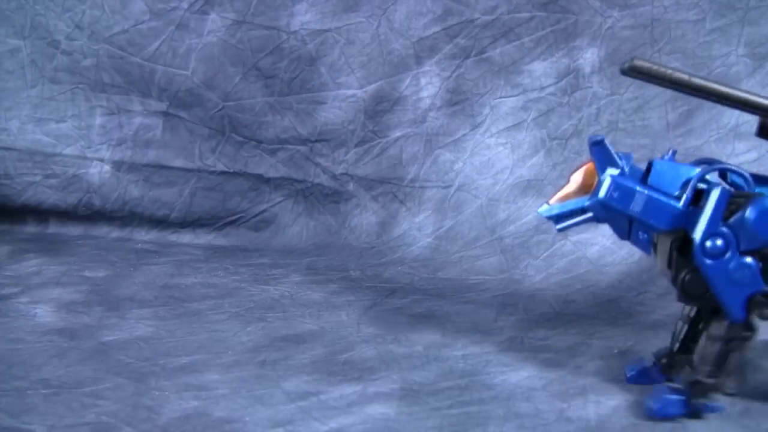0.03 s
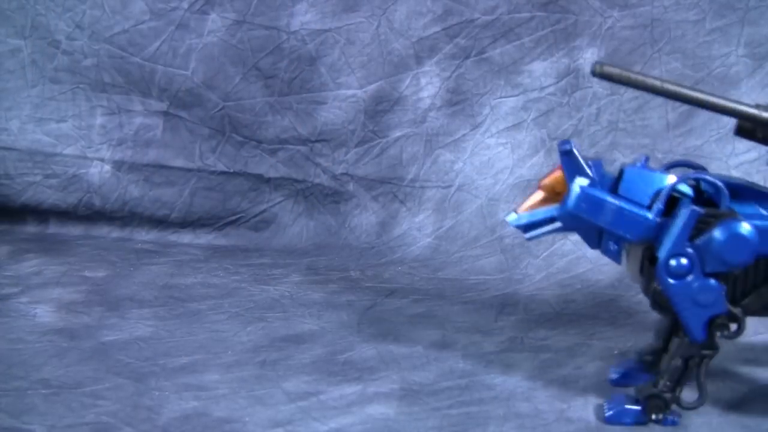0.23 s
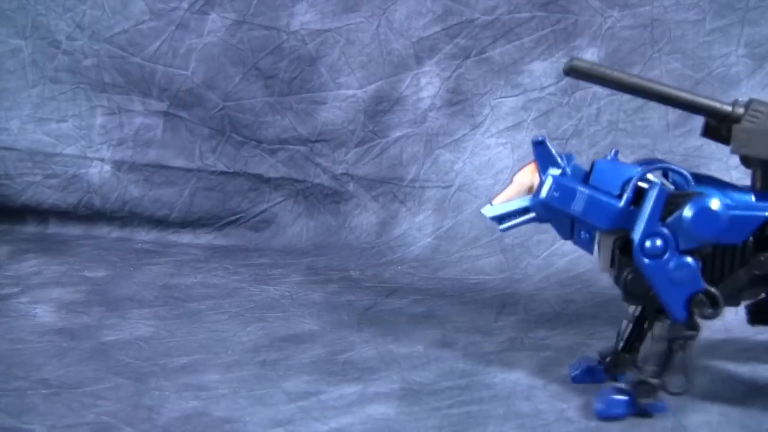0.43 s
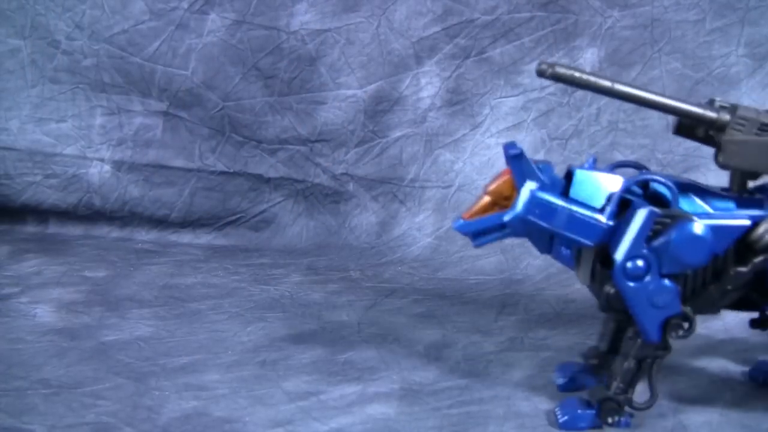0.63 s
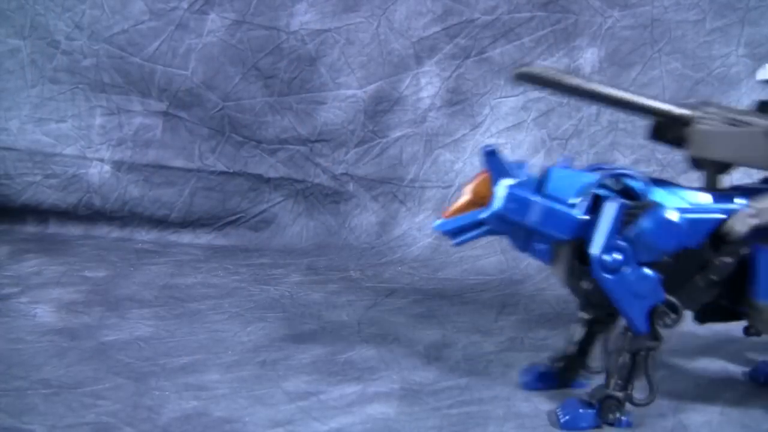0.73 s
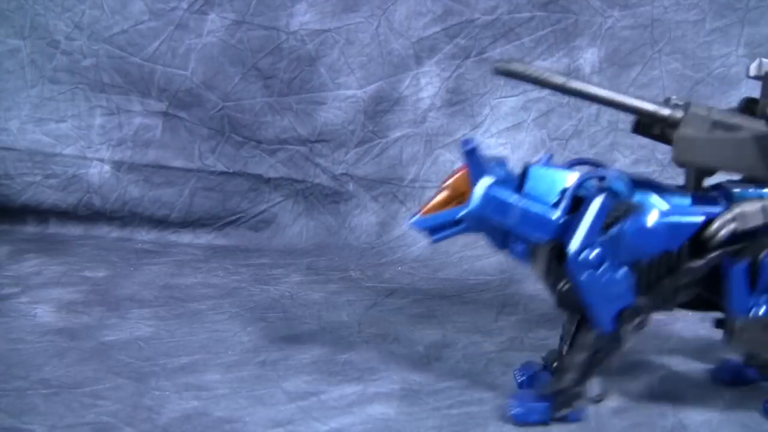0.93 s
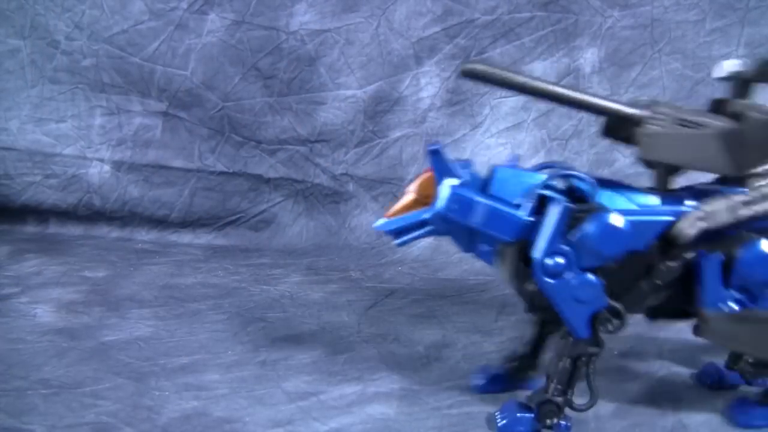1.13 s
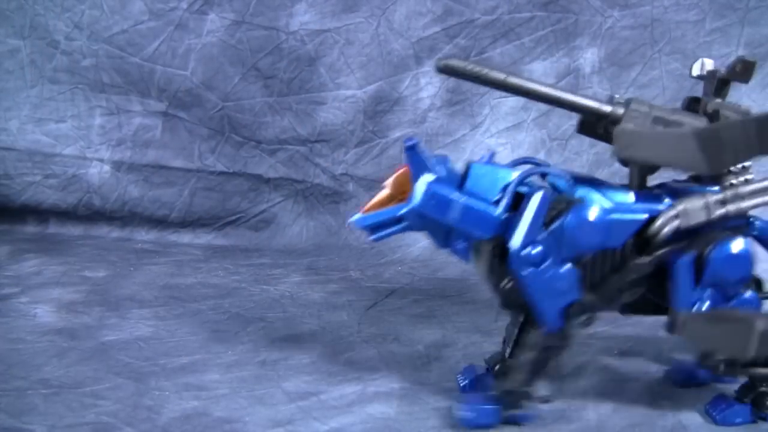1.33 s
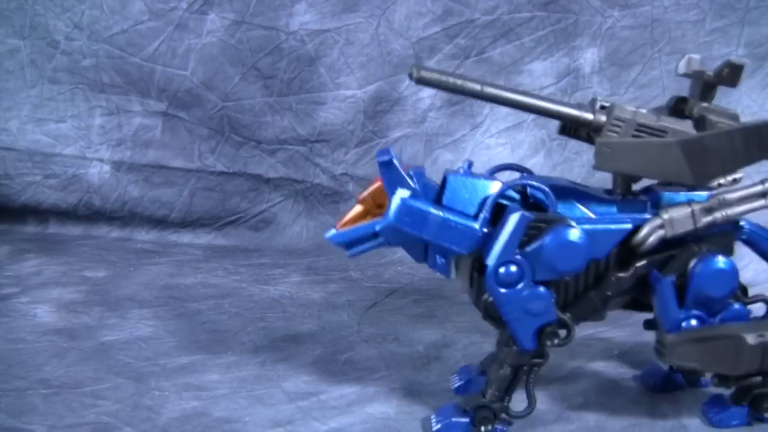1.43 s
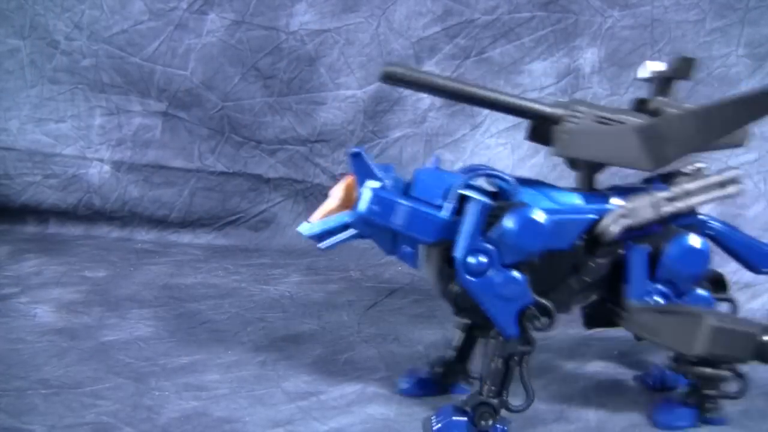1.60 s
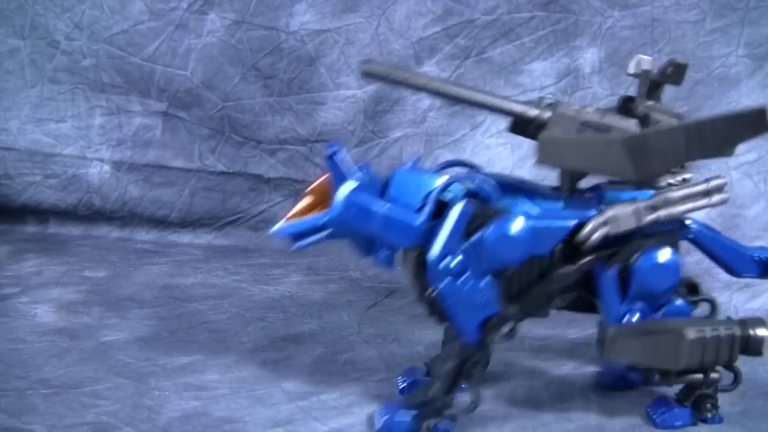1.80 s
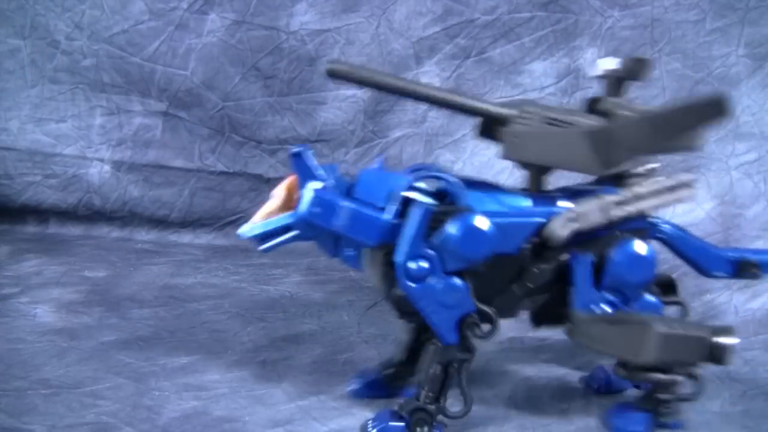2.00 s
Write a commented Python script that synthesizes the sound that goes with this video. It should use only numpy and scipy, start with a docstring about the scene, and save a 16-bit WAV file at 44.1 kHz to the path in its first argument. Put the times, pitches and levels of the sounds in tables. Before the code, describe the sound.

High, grainy whirring from a wind-up walking toy, with faint foot taps and small clicks

```python
"""On a cloth-covered table in a quiet room, a small clockwork model walks towards the middle.
Gear teeth tick thousands of times a second and excite the resonances of its plastic casing, under a varying load.
Feet excite damped modes of the table top and knock the casing; a foot snaps down and a joint clicks.
Shaped noise and steady sines give the room's rumble and hum and the microphone's hiss."""
import sys
import numpy as np
from scipy import signal
from scipy.fft import next_fast_len
from scipy.io import wavfile

SR = 44100
rng = np.random.default_rng(int(sys.argv[2]) if len(sys.argv) > 2 else 0)


def pcm_store(signal):
    """Save signal as 16-bit PCM."""
    levels = np.round(np.clip(np.atleast_2d(signal), -1, 1) * 32767)
    wavfile.write(sys.argv[1], SR, levels.astype(np.int16).T)


N = 90581

# Load on the gear train, heard in four parts of its sound:
# (time [s], whine level [dB], top level [dB], rattle level [dB], hollow level [dB])
GEAR_LOAD = [(0.0, -36, -35, -43, -48.5), (0.13, -44, -39.5, -48.5, -51.5), (0.2, -36.5, -36.5, -45, -44),
             (0.39, -39.5, -37.5, -46, -51.5), (0.42, -36, -36, -43, -44), (0.43, -37.5, -36.5, -42.5, -51),
             (0.46, -38, -35.5, -44.5, -48.5), (0.57, -41, -39, -50, -51.5), (0.61, -36, -36, -43.5, -48.5),
             (0.65, -36, -34.5, -41, -47.5), (0.67, -39, -36.5, -47, -47.5),
             (0.76, -38.5, -36.5, -48, -52.5), (0.82, -34.5, -34, -42.5, -44), (0.86, -36, -34.5, -45, -50),
             (0.95, -41, -37.5, -48.5, -48), (1.04, -34, -36, -45.5, -48), (1.08, -37, -34, -45.5, -44.5),
             (1.09, -39, -37, -45, -48), (1.16, -35.5, -38, -48.5, -50), (1.26, -33.5, -34, -45.5, -48.5),
             (1.39, -41.5, -38, -49.5, -49.5), (1.46, -34.5, -35, -48, -48),
             (1.5, -31.5, -35.5, -43.5, -44.5), (1.51, -37.5, -38, -47, -47.5),
             (1.64, -36, -36.5, -48, -49.5), (1.68, -32, -34, -45.5, -49),
             (1.81, -39.5, -37.5, -49.5, -50.5), (1.92, -34, -35.5, -45, -46.5),
             (2.02, -36, -41, -50.5, -50), (2.04, -36.5, -39, -49, -46), (2.05, -34, -39, -48, -56)]
# Casing resonances, from low to high parts; the highest row of the top is a hiss that swells with the load.
# Pan and diffuse part hold at an off-centre factor of 1:
# (frequency [Hz], width of one filter stage [Hz], relative level [dB], left-right pan [dB], diffuse part [dB])
HOLLOW_MODES = [(468, 190, -16.5, -3, -12), (673, 33, -14, -2, -14), (763, 147, -18, -7, -17),
                (1213, 380, -9, -1, -15), (1383, 216, 0.5, -1, -26), (1395, 60, -4.5, -2, -26),
                (1619, 390, -3, -1.5, -25)]
RATTLE_MODES = [(2032, 410, -1.5, -1, -33), (2108, 36, 1.5, -3.5, -32), (2435, 76, -0.5, 1, -30),
                (2621, 530, -1, 0.5, -38), (2720, 28, 3.5, -3, -40), (3203, 950, -2, -5.5, -43),
                (3932, 510, -1, -8.5, -44), (4433, 180, 0, 8, -30)]
FLANK_MODES = [(4808, 730, 0, -1, -32)]
WHINE_MODES = [(5260, 460, 1, -5.5, -14), (5270, 60.5, 3, -15, -14), (5460, 62, 1, -3, -6),
               (5587, 120.2, 1.5, -2, -16), (5750, 500, -2.5, 12.5, -16), (5630, 56, 1.5, -14, -14),
               (6113, 510, -4.5, -19, -5), (6614, 810, -10, -15, 1)]
TOP_BANDS = [(7470, 1050, -10.5, -8, 2), (8430, 1100, -10.5, -4, -9), (9210, 920, -7.5, -5, -9),
             (10420, 1560, -8.5, 0.65, -5), (11200, 1080, -1.5, 4.5, -6), (11060, 110, -7.5, 0, -11),
             (11450, 140, -4.5, 2, -4), (12400, 1200, -15, 3, -16), (14000, 1400, -21.5, -2, 11),
             (15650, 680, -12, 0, 2)]
# Position of the model: (time [s], off-centre factor [0 to 1])
OFF_CENTRE_PATH = [(0, 0.84), (1.0, 0.45), (2.05, 0.018)]
# Where the whine is strongest; its departures from the mean are used: (time [s], frequency [Hz])
WHINE_RIDGE_PATH = [(0, 5452), (.16, 5617), (.35, 5457), (.58, 5648), (.67, 5420), (1.4, 5534),
                    (1.66, 5317), (1.9, 5558), (2.05, 5328)]
# Landings of the feet:
# (time [s], relative thud level [dB], relative casing knock level [dB], table pitch favoured by the spot [Hz])
FOOTFALLS = [(.232, -51, -50, 250), (0.263, -52.5, -45, 288), (0.421, -62, -49, 290), (.628, -56, -52, 620),
             (0.835, -60, -58, 790), (1.025, -59, -51, 790), (1.075, -56, -42, 500),
             (1.106, -53.5, -61, 400), (1.248, -59, -44.5, 500), (1.328, -55, -59, 175),
             (1.497, -53.5, -43.5, 402), (1.679, -53.5, -47, 297), (1.911, -54, -56, 470),
             (1.936, -64, -40, 400)]
# Modes of the table top: (frequency [Hz], relative level [dB], decay time t60 [s])
TABLE_MODES = [(180, -8, 0.048), (208, 1.5, 0.1), (287, 2.5, 0.1), (404, -3, 0.045), (466, 4.5, 0.087),
               (627, 7, 0.05), (760, 14, 0.032)]
# Deep bumps of the table: (time [s], approximate peak level [dB])
TABLE_SWAYS = [(.63, -51.5), (1.99, -52)]
# Snaps of a joint: (time [s], relative level [dB])
JOINT_SNAPS = [(.2069, -35), (0.416, -25), (.651, -31), (1.256, -23), (1.499, -34), (1.6447, -25)]
# Rumble spectrum: (frequency [Hz], relative level per Hz [dB])
ROOM_SPECTRUM = [(12, -30), (20, 0), (38, 2), (59, -3), (122, -5), (160, -10), (199, -8), (231, -8.5),
                 (283, -0.5), (329, -6.5), (484, -10), (870, -16.5), (1100, -16), (1430, -38), (2420, -120)]
# Left-right likeness of the rumble: (frequency [Hz], likeness [0 to 1])
ROOM_LIKENESS = [(30, .98), (60, 0.96), (141, 0.35), (220, 0.5), (500, 0.68), (1000, 1)]
# Left-right balance of the rumble: (frequency [Hz], left over right [dB])
ROOM_BALANCE = [(60, -0.5), (140, 3.5), (300, -1), (600, -3)]
# Steady hum: (frequency [Hz], rms level [dB])
HUM_TONES = [(31.8, -68.5), (60, -82), (89.6, -68.5), (120, -65.5)]

TICKS_PER_S, TICK_SPREAD_DB, TICK_OWN_DB = 10000, 0.85, 2.5
CHATTER_DB, CHATTER_HZ = 0.3, 80  # quick unevenness of the mesh
MESH_PER_S, MESH_WANDER, MESH_DB = 338, 0.0603, -0.5  # tooth rate of the fastest wheel
WAVER_DB, WAVER_HZ = 1.43, 6  # each resonance swells and fades on its own
NARROW_WAVER_DB, NARROW_HZ = 2, 110  # extra waver of the sharp resonances
PITCH_WANDER, PITCH_WANDER_HZ = .004, 4  # relative straying of pitch as the casing flexes
RIDGE_FOLLOW = .5  # share of the ridge movement taken by the broadest whine resonances
FLANK_DB, FLANK_OFF_CENTRE_DB = -9, -6  # relative to the whine; the second times the off-centre factor
LEFT_LAG_S = 22e-6  # lag of the left channel at an off-centre factor of 1
KNOCK_HZ, KNOCK_WIDTH_HZ = 1385, 170
SOLE_HZ = 900  # softness of the contact through the cloth
SPOT_DB_PER_OCTAVE = 11.5  # loss of modes away from the favoured pitch
SWAY_HZ, SWAY_T60_S = 30, 0.69
TAP_S, TAP_PEAK_DB, TAP_SOFTNESS_HZ = 2.012, -34, 1300
SNAP_HZ, SNAP_WIDTH_HZ = 5500, 2200
RUMBLE_RMS_DB, RUMBLE_PATCHY_DB, RUMBLE_PATCHY_HZ = -59, 2.5, 3.8
MIC_HISS_RMS_DB, MIC_HISS_HZ, MIC_HISS_WIDTH_HZ, MIC_HISS_LIKENESS = -52, 14300, 3400, 0.14
CUTOFF_HZ = 15720
LEFT_RIGHT = np.array([[1], [-1]])


def gear_ticks():
    """Random impulse excitation: tooth contacts of uneven size, their strength modulated at the mesh rate."""
    born = rng.random(N) < TICKS_PER_S / SR
    mesh_hz = MESH_PER_S * (1 + MESH_WANDER * drift(24.5))
    mesh = np.cos(2 * np.pi * np.cumsum(mesh_hz) / SR)
    size_db = TICK_SPREAD_DB * np.minimum(rng.exponential(1, N), 5)
    return born * amp(size_db + CHATTER_DB * drift(CHATTER_HZ) + MESH_DB * mesh)


def excited_bands(ticks, bands, level_db, lag_s=0, shift_hz=0):
    """Resonant filtering of impulses: each tick drives every band with its own strength and sign."""
    off_centre, = in_time(OFF_CENTRE_PATH)
    out = 0
    for hz, width_hz, db, pan_db, diffuse_db in bands:
        sharp = np.exp(-width_hz / NARROW_HZ)
        waver_db = WAVER_DB + NARROW_WAVER_DB * sharp
        signs = rng.choice([-1, 1], (2, N))
        strength_db = TICK_OWN_DB * rng.standard_normal(N) + waver_db * drift(WAVER_HZ)
        ringing = resonate(ticks * signs * amp(strength_db), hz, width_hz)
        stray_hz = PITCH_WANDER * hz * drift(PITCH_WANDER_HZ)
        # sharp resonances barely follow the common shift
        mid, side = shifted(ringing, (1 - sharp) ** 2 * shift_hz + stray_hz)
        # a small delay is approximated by subtracting the slope
        side = amp(diffuse_db) * side - lag_s * SR / 2 * np.gradient(mid)
        panned = mid * amp(pan_db * off_centre / 2 * LEFT_RIGHT)
        out = out + amp(db) * (panned + off_centre * side * LEFT_RIGHT)
    return amp(level_db) * rms_one(out)


def gear_train():
    """Common excitation: the same ticks drive the casing and the load-borne hiss, each part at its load level."""
    ticks = gear_ticks()
    whine_db, top_db, rattle_db, hollow_db = in_time(GEAR_LOAD)
    off_centre, = in_time(OFF_CENTRE_PATH)
    ridge_hz, = in_time(WHINE_RIDGE_PATH)
    whine_shift_hz = RIDGE_FOLLOW * (ridge_hz - ridge_hz.mean())
    flank_db = whine_db + FLANK_DB + FLANK_OFF_CENTRE_DB * off_centre
    whine = excited_bands(ticks, WHINE_MODES, whine_db, LEFT_LAG_S, whine_shift_hz)
    top = excited_bands(ticks, TOP_BANDS, top_db, LEFT_LAG_S)
    flank = excited_bands(ticks, FLANK_MODES, flank_db, LEFT_LAG_S)
    rattle = excited_bands(ticks, RATTLE_MODES, rattle_db)
    hollow = excited_bands(ticks, HOLLOW_MODES, hollow_db)
    return whine + top + flank + rattle + hollow


def feet():
    """Impact on a damped plate: landings ring table modes through a soft contact and knock the casing."""
    s, thud_db, knock_db, spot_hz = np.transpose(FOOTFALLS)
    chance_db = rng.normal(0, 1, (len(s), len(TABLE_MODES)))
    thuds = 0
    for k, (hz, db, t60) in enumerate(TABLE_MODES):
        spot_loss_db = SPOT_DB_PER_OCTAVE * abs(np.log2(hz / spot_hz))
        blows = clicks(s, thud_db + db + chance_db[:, k] - spot_loss_db)
        thuds = thuds + ring(blows, hz, t60)
    sways = ring(clicks(*np.transpose(TABLE_SWAYS)), SWAY_HZ, SWAY_T60_S)
    knocks = resonate(clicks(s, knock_db) * SR / KNOCK_WIDTH_HZ, KNOCK_HZ, KNOCK_WIDTH_HZ)
    soft = np.exp(-2 * np.pi * SOLE_HZ / SR)
    softened = signal.lfilter([(1 - soft) ** 2], [1, -2 * soft, soft * soft], thuds + sways)
    return softened + knocks


def tap():
    """Critically damped pulse: one foot snaps down as a single rounded push."""
    age = np.maximum(np.arange(N) / SR - TAP_S, 0) * 2 * np.pi * TAP_SOFTNESS_HZ
    return amp(TAP_PEAK_DB) * np.e * age * np.exp(-age)


def snaps():
    """Impulse response of a broad resonance: a joint snaps over with lone bright clicks."""
    blows = clicks(*np.transpose(JOINT_SNAPS)) * SR / SNAP_WIDTH_HZ / 2
    return resonate(blows, SNAP_HZ, SNAP_WIDTH_HZ)


def rumble():
    """Band-filtered noise: half-octave bands drift in level, with likeness and balance set by frequency."""
    edges = 18 * 2 ** np.arange(0, 6.6, .5)
    white = rng.standard_normal((2, 2, N + SR))
    out = 0
    for k, (low, high) in enumerate(zip(edges, edges[1:])):
        band = signal.butter(2, [low, high], "band", fs=SR, output="sos")
        mid, side = signal.sosfilt(band, white[k % 2])[:, SR:]
        hz = np.sqrt(low * high)
        level = amp(at_hz(ROOM_SPECTRUM, hz) + RUMBLE_PATCHY_DB * drift(RUMBLE_PATCHY_HZ))
        balance = amp(at_hz(ROOM_BALANCE, hz) / 2 * LEFT_RIGHT)
        out = out + level * spread(mid, side, at_hz(ROOM_LIKENESS, hz)) * balance
    return amp(RUMBLE_RMS_DB) * rms_one(out)


def hum():
    """Superposition of steady sines with random starting phases."""
    out = 0
    for hz, db in HUM_TONES:
        cycles = hz * np.arange(N) / SR + rng.random()
        out = out + np.sqrt(2) * amp(db) * np.sin(2 * np.pi * cycles)
    return out


def microphone_hiss():
    """Resonantly filtered white noise: microphone hiss, nearly independent in the two channels."""
    mid, side = resonate(rng.standard_normal((2, N)), MIC_HISS_HZ, MIC_HISS_WIDTH_HZ)
    return amp(MIC_HISS_RMS_DB) * rms_one(spread(mid, side, MIC_HISS_LIKENESS))


def amp(db):
    """Decibel law: amplitude ratio of a level."""
    return 10 ** (np.asarray(db) / 20)


def rms_one(x):
    """Normalisation to unit root-mean-square."""
    return x / np.sqrt(np.mean(x ** 2) + 1e-20)


def in_time(rows):
    """Linear interpolation of each column over time."""
    s, *columns = np.transpose(rows)
    return [np.interp(np.arange(N) / SR, s, c) for c in columns]


def at_hz(points, hz):
    """Linear interpolation over logarithmic frequency."""
    table_hz, values = np.transpose(points)
    return np.interp(np.log(hz), np.log(table_hz), values)


def drift(rate_hz):
    """Low-pass-filtered noise: a slow random course of unit rms."""
    r = np.exp(-2 * np.pi * rate_hz / SR)
    return rms_one(signal.lfilter([1], [1, -2 * r, r * r], rng.standard_normal(N + SR))[SR:])


def resonate(x, hz, width_hz):
    """Second-order resonance applied twice, which leaves little sound between the peaks."""
    r = np.exp(-np.pi * width_hz / SR)
    stage = [(1 - r * r) / 2, 0, (r * r - 1) / 2, 1, -2 * r * np.cos(2 * np.pi * hz / SR), r * r]
    return signal.sosfilt([stage, stage], x)


def ring(blows, hz, t60):
    """Damped free vibration: a unit click starts a decaying sine of height 1."""
    r, w = amp(-60 / (t60 * SR)), 2 * np.pi * hz / SR
    return signal.lfilter([0, np.sin(w)], [1, -2 * r * np.cos(w), r * r], blows + 1e-18)


def clicks(s, db):
    """Impulse train: one sample per event, over a negligible floor."""
    out = np.full(N, 1e-18)
    out[(np.asarray(s) * SR).astype(int)] = amp(db)
    return out


def shifted(x, shift_hz):
    """Single-sideband modulation: all frequencies move by the same changing amount."""
    analytic = signal.hilbert(x, next_fast_len(N))[..., :N]
    return np.real(analytic * np.exp(2j * np.pi * np.cumsum(shift_hz) / SR))


def spread(mid, side, alike):
    """Partial correlation: sum and difference weights set the likeness of two channels."""
    alike = np.clip(alike, 0, 1)
    return np.sqrt(1 + alike) * mid + np.sqrt(1 - alike) * side * LEFT_RIGHT


def scene():
    """Linear superposition of the gear train, impacts, room and microphone hiss."""
    return gear_train() + feet() + tap() + snaps() + rumble() + hum() + microphone_hiss()


def record(dry):
    """Elliptic low-pass filtering: the highest treble is cut steeply."""
    return signal.sosfilt(signal.ellip(14, .3, 65, CUTOFF_HZ, fs=SR, output="sos"), dry)


dry = scene()
out = record(dry)
pcm_store(out)
```